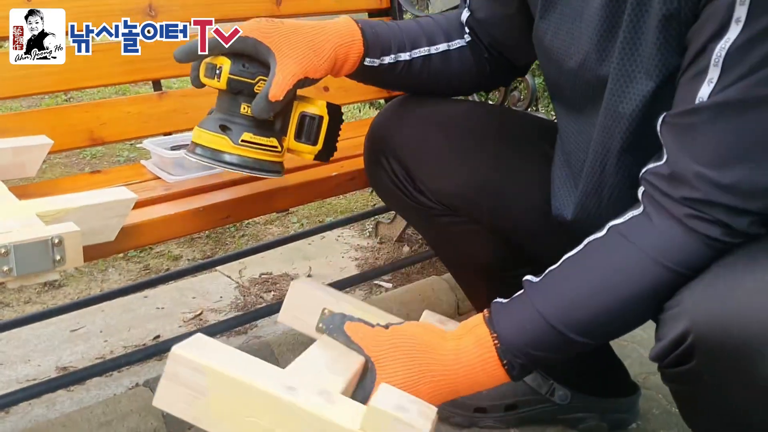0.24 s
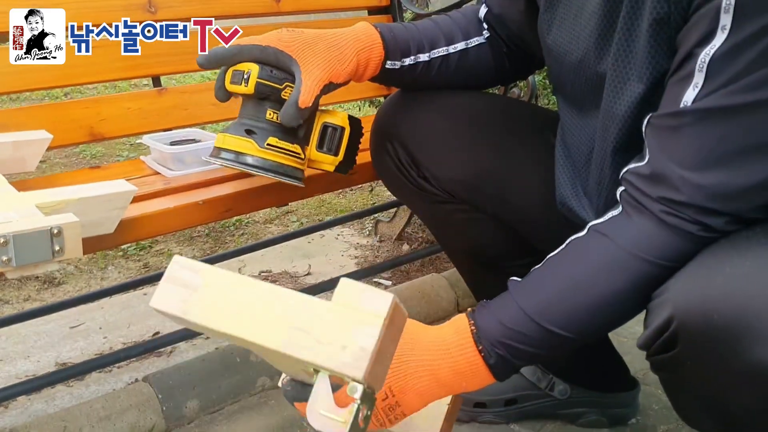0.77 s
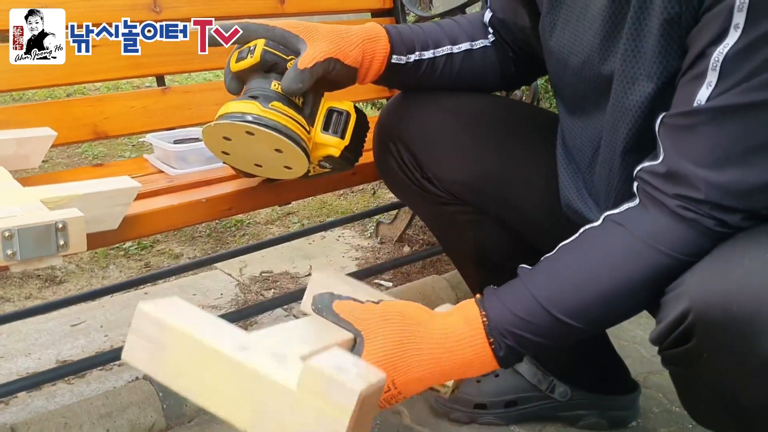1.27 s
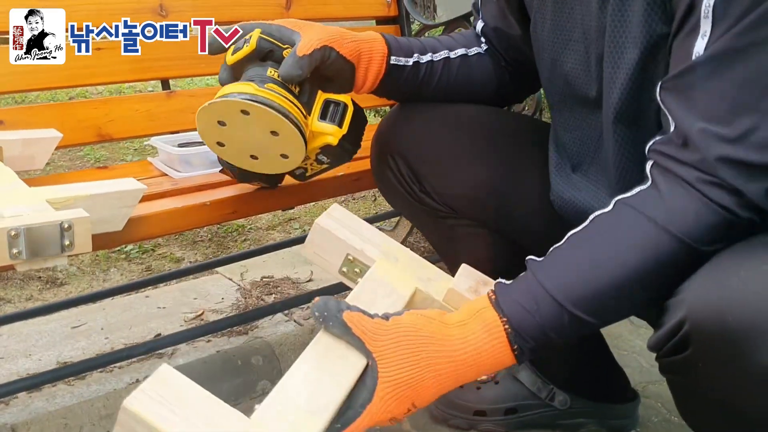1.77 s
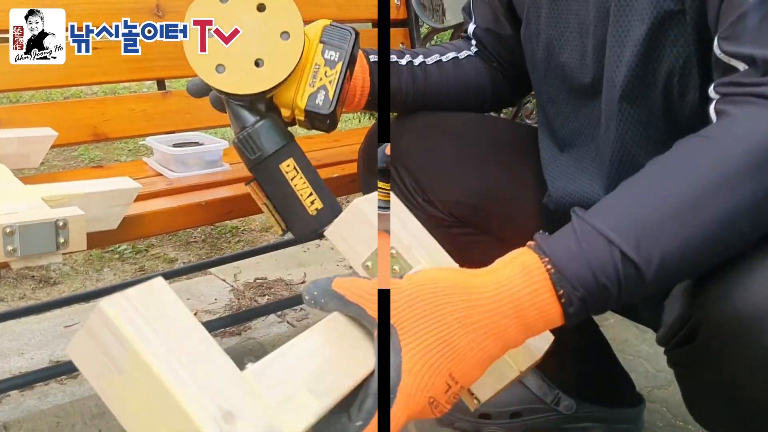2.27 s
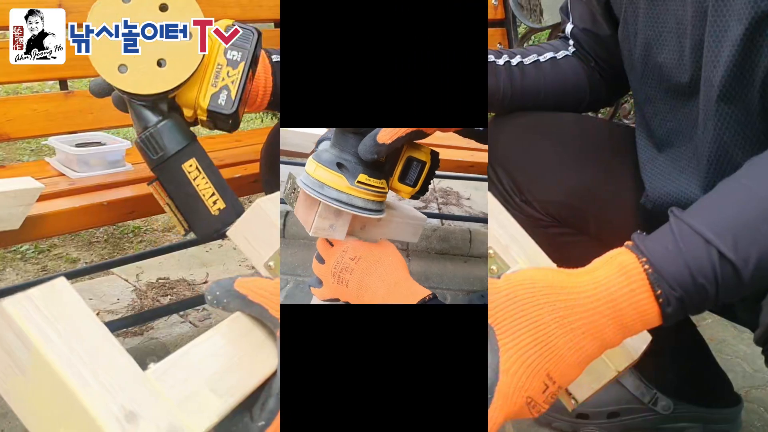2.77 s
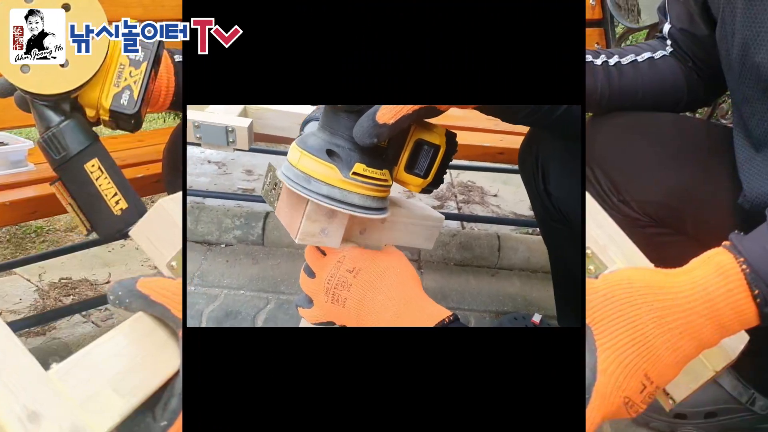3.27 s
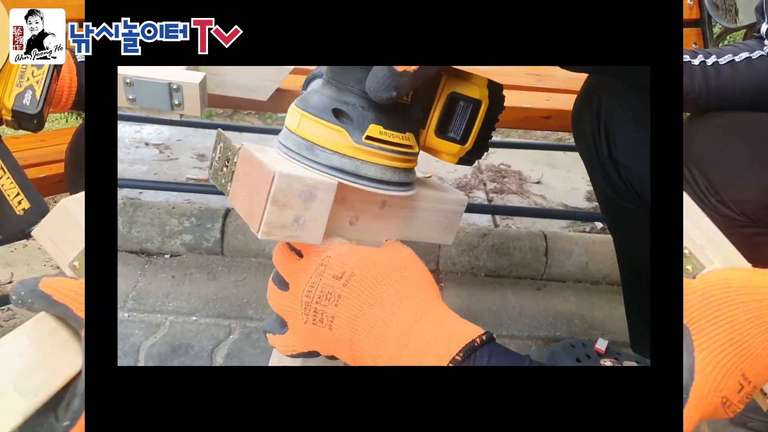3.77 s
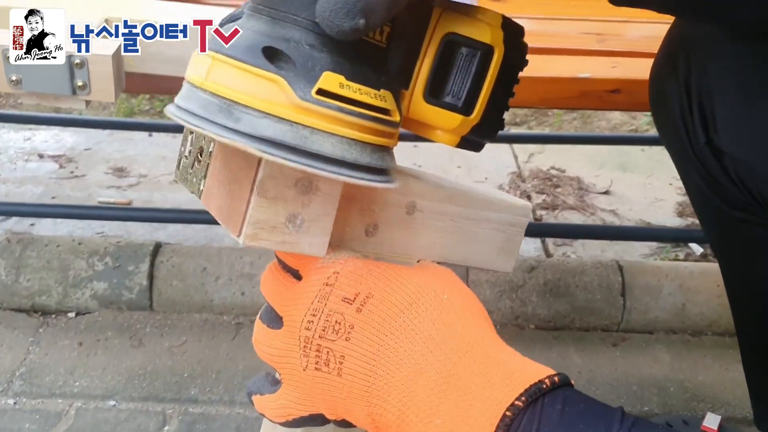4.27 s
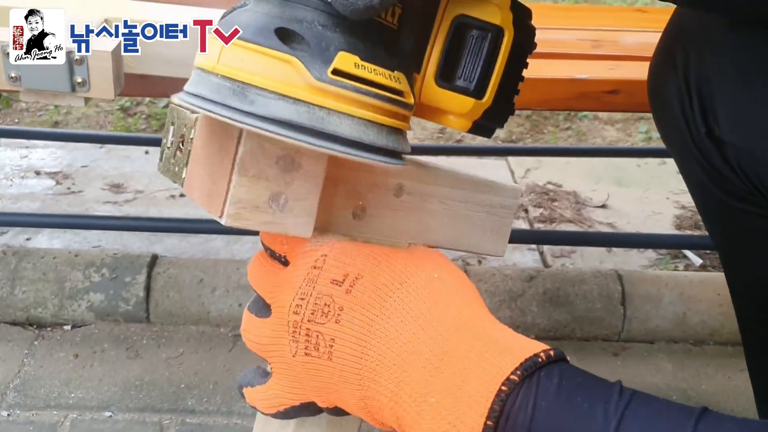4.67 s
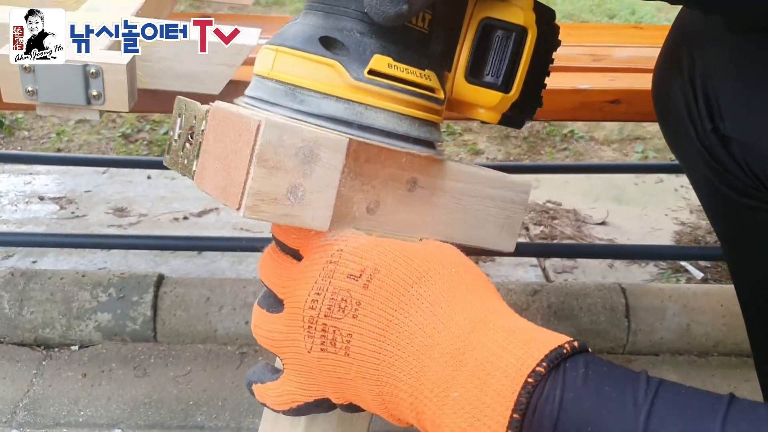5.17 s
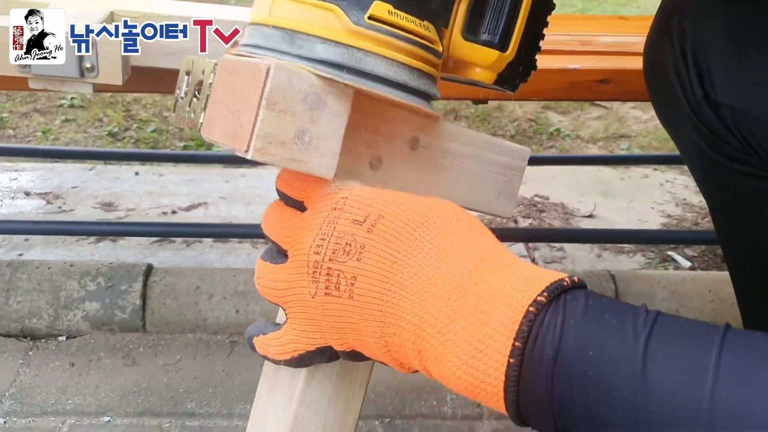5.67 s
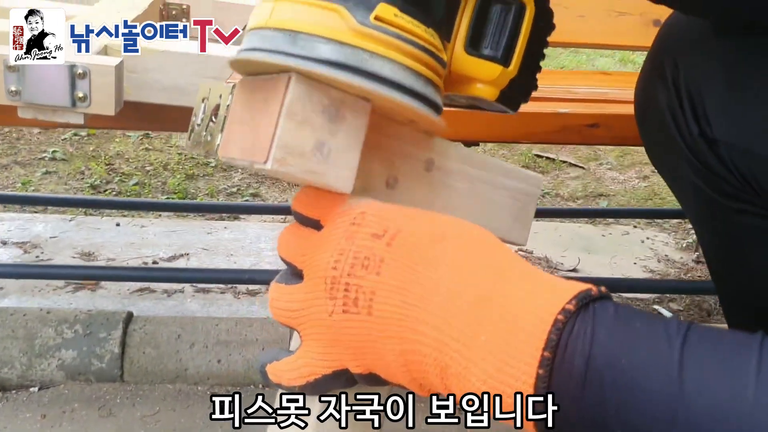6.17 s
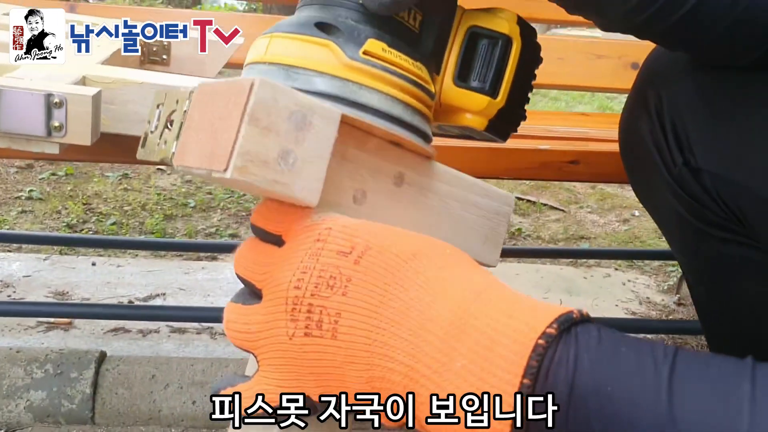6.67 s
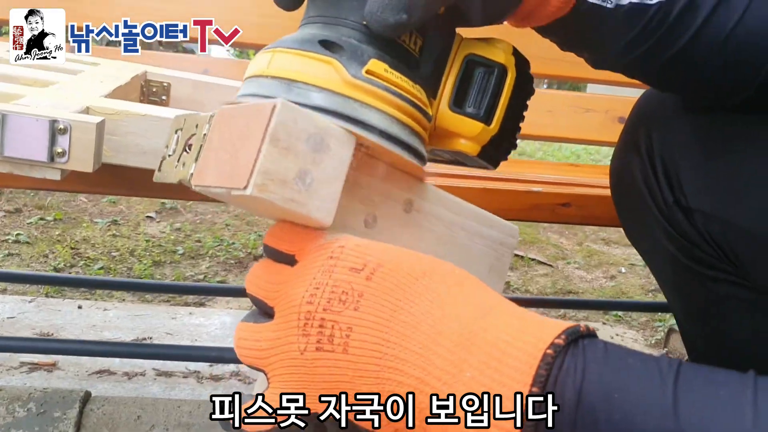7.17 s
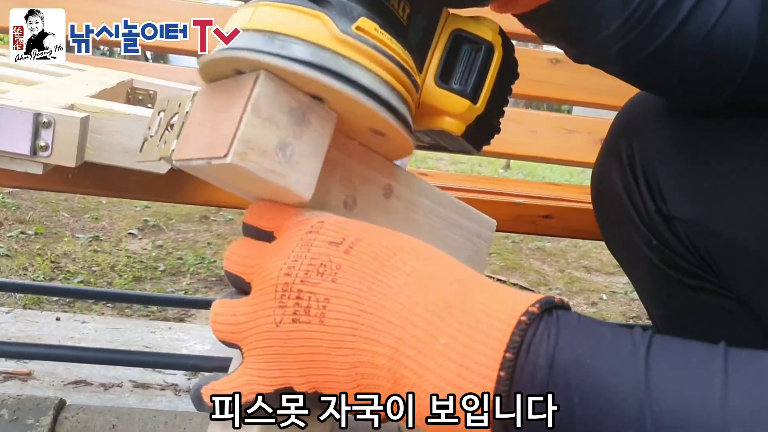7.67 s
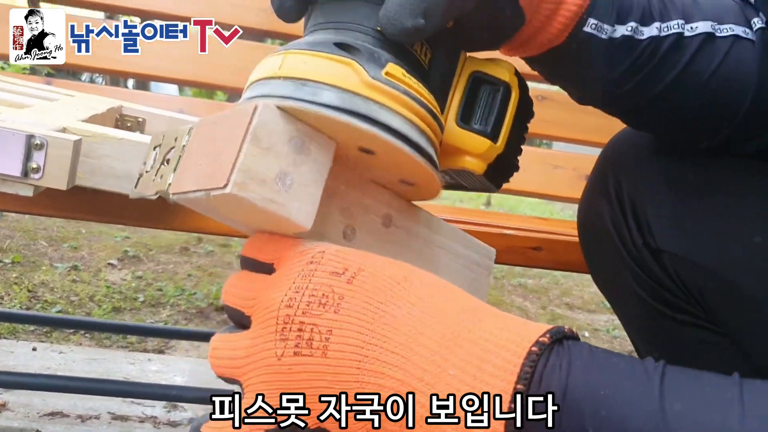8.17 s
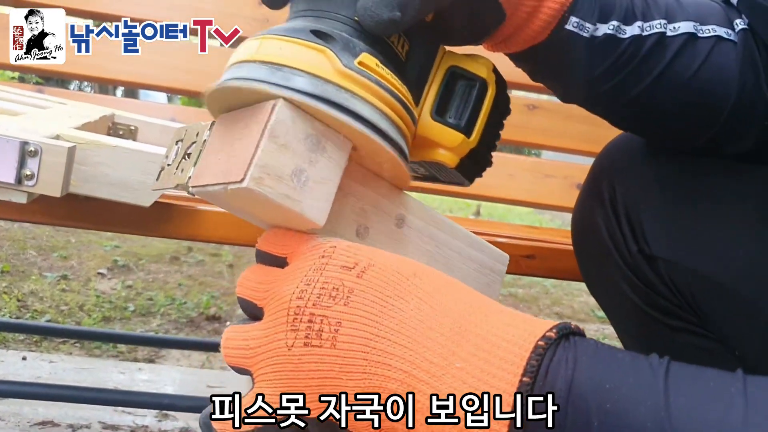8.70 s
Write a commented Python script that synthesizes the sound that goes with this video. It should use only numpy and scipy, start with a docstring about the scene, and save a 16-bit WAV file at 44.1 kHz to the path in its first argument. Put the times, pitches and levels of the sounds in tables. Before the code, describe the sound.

Outdoors, a vehicle draws near as wood is handled; sound cuts out, then an electric sander drones and hisses harshly on a block until the end.

```python
"""A vehicle draws near a quiet park bench: rumble, roar and hiss are coloured noise that swells, with a thin
whistle. Meanwhile wood is handled: ticks and knocks are short puffs of band noise. The sound drops out and
ticks once, a scrap of three sines; then an orbital sander runs on a hand-held block: orbit harmonics, pad
chatter and grit noise locked to the orbit. Only the right input is live; the left holds a trace and faint hiss."""
import sys
import numpy as np
from scipy import signal
from scipy.io import wavfile
from scipy.ndimage import uniform_filter1d

SR = 44100
rng = np.random.default_rng(int(sys.argv[2]) if len(sys.argv) > 2 else 0)


def log_audio(samples):
    """Write samples as a 16-bit WAV file to the path given in sys.argv[1]."""
    # one column per channel
    frames = np.atleast_2d(samples).T
    # limit to full scale, then quantise
    limited = np.clip(frames, -1, 1)
    pcm = np.round(limited * 32767).astype(np.int16)
    wavfile.write(sys.argv[1], SR, pcm)


N = 394254

# Levels of the sander, handling and traffic are in dB before scene() doubles those layers.
SILENCE_START_S, SILENCE_END_S = 2.1535, 2.3527


def sander():
    """The motor turns the pad at a wandering speed; that one orbit angle drives orders, chatter and grit."""
    # The sander under the moving hand. Each row: time in s, orbit speed in Hz before sag and wander.
    speed_curve = [(2.36, 145.1), (2.99, 143.6), (3.35, 144.2), (3.54, 142.6), (3.63, 144.5), (3.81, 143.8),
                   (4.0, 145.8), (4.25, 141.6), (4.41, 140.5), (4.66, 143.9), (4.81, 142.3), (5.11, 143.1),
                   (5.28, 146.5), (5.46, 147.4), (5.99, 144.1), (6.1, 145.5), (6.3, 143.9), (6.63, 143.4),
                   (6.77, 145.7), (6.94, 146.3), (7.14, 143.4), (7.25, 145.4), (7.55, 143.5), (7.74, 140),
                   (7.95, 143), (8.22, 143.5), (8.48, 140.7), (8.93, 140.4)]
    # The two strongest orders trade places as the pad travels.
    # Each row: time in s, third order level in dB, second order level in dB.
    hum_curve = [(2.36, -28.5, -31.5), (2.6, -22, -36.5), (2.8, -34, -32.5), (2.84, -22, -32),
                 (2.98, -25.5, -38.5), (3.04, -30.5, -31), (3.22, -23.5, -32), (3.33, -33.5, -30),
                 (3.47, -22.5, -37), (3.64, -31.5, -29), (3.77, -22.5, -38.5), (4.02, -31, -30),
                 (4.24, -20, -33.5), (4.54, -26.5, -38.5), (4.68, -28, -30), (4.81, -21, -42),
                 (4.97, -25, -33), (5.12, -24, -60), (5.2, -30.5, -31.5), (5.84, -24.5, -31.5),
                 (5.91, -24, -38), (6.09, -30, -27), (6.26, -22, -42), (6.42, -30, -27), (6.53, -21, -33),
                 (6.71, -31.5, -33), (7.04, -24, -28.5), (7.1, -23, -36.5), (7.37, -31.5, -28),
                 (7.52, -21, -37.5), (7.61, -30.5, -31), (7.92, -26.5, -39.5), (8.1, -26, -31),
                 (8.38, -22.5, -43.5), (8.42, -26.5, -50), (8.47, -23, -37), (8.71, -27, -32.5),
                 (8.78, -25, -42.5), (8.87, -25.5, -30.5), (8.93, -30, -32)]
    # Slow levels. Each row: time in s, fifth order level in dB, fourth order level in dB,
    # grit level in dB before its sway.
    slow_curve = [(2.36, -36.5, -34, -22), (2.6, -30, -29.0, -22.5), (2.76, -27, -34, -22),
                  (3.34, -36, -28.5, -22), (3.71, -34, -31.0, -22), (4.18, -32.5, -27.5, -22.5),
                  (4.51, -29.5, -36.5, -22), (4.66, -26.5, -30, -21), (4.78, -32.5, -29.1, -23.5),
                  (5.38, -35.5, -28.5, -22), (5.66, -35, -31, -23.2), (5.98, -30, -28.5, -21.6),
                  (6.64, -35, -30, -22.5), (6.85, -34.4, -28, -21), (7.11, -34, -30, -23.5),
                  (7.71, -31.6, -29, -21), (8.2, -35.5, -31.5, -22.5), (8.93, -32.5, -25.5, -21.5)]
    sag_hz_per_db = 0.12  # the motor sags a little while the third order is strong

    speed_hz, = played(speed_curve)
    third_db, second_db = played(hum_curve)
    fifth_db, fourth_db, grit_db = played(slow_curve)
    running = round(hum_curve[0][0] * SR)
    third_excess_db = third_db - third_db[running:].mean()
    speed_hz = speed_hz - sag_hz_per_db * third_excess_db
    fast_hz = speed_hz - speed_hz[running:].mean()
    orbit = 2 * np.pi * np.cumsum(speed_hz + 0.5 * drift(11.65).real) / SR
    contact = orbit + 0.029 * drift(8.9).real  # the pad lands a little early or late

    out = unbalanced_weight(orbit)
    out += strong_orders(contact, second_db, third_db)
    out += wandering_orders(contact, fourth_db, fifth_db, third_excess_db, fast_hz)
    # under light load the buzz takes over from scratching
    held_db = 0.59 * fast_hz + 3.23 * drift(5.8).real
    grit_db = grit_db - 0.035 * third_excess_db + 0.85 * drift(6).real
    return out + pad_chatter(contact, held_db) + grit_hiss(orbit, contact, held_db, grit_db)


def unbalanced_weight(orbit):
    """The unbalanced weight gives one nearly steady cosine per orbit."""
    level_db = -32.5 + 0.8 * drift(8.0).real
    return gain_of(level_db) * np.sqrt(2) * np.cos(orbit)


def strong_orders(contact, second_db, third_db):
    """The second and third multiples of the orbit, with strength and phase wavering a little."""
    out = np.zeros(N)
    for k, db in ((2, second_db), (3, third_db)):
        swing = evened(1 + 0.12 * k * drift(6.2))  # the higher order is rougher
        wave = swing * np.exp(1j * (k * contact + 0.47 * k ** 2))
        out += np.sqrt(2) * gain_of(db) * wave.real
    return out


def wandering_orders(contact, fourth_db, fifth_db, third_excess_db, fast_hz):
    """Orders from the fourth up, each partly steady and partly wandering as the pad creeps."""
    # Each row: multiple of the orbit speed, base level in dB, steady share from 0 to 1,
    # change in dB per dB of the third order, change in dB per Hz of orbit speed.
    upper_orders = [(6, -35.5, 0.83, 0.5, 0.5), (7, -35, 0.5, 0.6, 0.5), (8, -28.5, 0.78, 0.27, 0.3),
                    (9, -27.5, 0.87, -0.26, 0.64), (10, -33.5, 0.27, 0, .1), (11, -33, 0.62, 0.45, .4),
                    (12, -30.5, 0.69, 0, 1), (13, -34.5, .3, 0, -0.5), (14, -34.5, 0.68, 0.1, 0.4),
                    (15, -42.5, 0, -2, -4), (16, -46, .4, 4, 3), (17, -48, 1, 0, 0),
                    (18, -45.5, 0, 0, -1.5), (19, -46, 0.98, 0.5, 2), (20, -41.5, 0.84, 1, -1)]
    lower_orders = [(4, fourth_db, 0.81, 0, 0), (5, fifth_db, 0.39, 0, 0)]
    housing_db = 2 * drift(7.2).real  # orders from 11 up swell together as the housing rings

    out = np.zeros(N)
    for k, db, steady, per_third, per_speed in [*lower_orders, *upper_orders]:
        follows_db = per_third * third_excess_db + per_speed * fast_hz
        if k >= 11:
            follows_db = follows_db + housing_db
        swing = steady + np.sqrt(1 - steady ** 2) * drift(6.5)
        phase = k * contact + 0.3 * k ** 2  # a fixed offset spreads the orders' phases
        out += np.sqrt(2) * gain_of(db + follows_db) * (swing * np.exp(1j * phase)).real
    return out


def pad_chatter(contact, held_db):
    """Patchy noise of the pad, pulsing once and twice an orbit and dropping as the buzz rises."""
    # Each row: frequency in Hz, relative level in dB per Hz.
    chatter_colour = [(20, -58), (50, -31), (100, 1), (200, -5), (420, 4), (900, -2.5), (1250, -28),
                      (1900, 13.5), (2500, 4.5), (3200, -3), (5000, -49)]
    pulse_db = 1.1 * np.cos(contact) + 0.76 * np.cos(2 * contact)
    level_db = -31 - 0.4 * held_db + pulse_db
    return noise(chatter_colour, 2.2, 0.76, size=2048) * gain_of(level_db)


def grit_hiss(orbit, contact, held_db, grit_db):
    """Grit scratches as free noise and buzzes as a retraced track, both pulsing with the orbit."""
    # Colour of the scratching. Each row: frequency in Hz, relative level in dB per Hz.
    scratch_colour = [(1350, -54), (2300, -3.5), (2820, -3.5), (3030, -9), (3400, -3), (4060, 0.5),
                      (4930, 1), (5480, -2), (6990, 3), (7770, -3), (9520, -7), (10600, -6), (14500, -14),
                      (15400, -15), (16000, -29)]
    # Colour of the buzz. Each row: frequency in Hz, relative level in dB per Hz.
    buzz_colour = [(1500, -13), (2300, -1), (2900, -8), (3500, -1), (4300, -1), (5500, -5.5), (7000, -5.5),
                   (10000, -10), (16000, -25)]
    # the bite once an orbit comes at a wandering angle; a weaker pulse comes twice an orbit
    bite_db = 1.4 * np.cos(contact + 2.2 + 1.7 * drift(7.8).real)
    scrape_db = bite_db + 0.62 * np.cos(2 * contact)
    scratch = 0.81 * gain_of(-0.6 * held_db) * noise(scratch_colour, 1.3, 1.0)
    track = retraced(orbit, kept=0.77)
    buzz = 0.58 * gain_of(held_db) * noise(buzz_colour, 2.2, source=track)
    return (scratch + buzz) * gain_of(grit_db + scrape_db)


def retraced(angle, kept):
    """Each orbit the grit meets nearly the same wood: a rough track that renews from turn to turn."""
    turns, points = 1400, 320  # points per turn
    fresh = rng.standard_normal((turns, points))
    track = signal.lfilter([1], [1, -kept], fresh, axis=0).ravel()
    return np.interp(angle / (2 * np.pi) * points, np.arange(track.size), track)


def handling():
    """Handled wood and plastic: ticks are brief snaps of noise, knocks a low thud with a clack."""
    # Small ticks. Each row: start in s, nominal peak in dB, nominal centre in Hz,
    # relative brightness in dB.
    tick_rows = [(0.1101, -43, 3950, -18), (0.183, -39, 4480, -18), (0.9434, -34, 5660, -20),
                 (0.9507, -37, 6940, -23), (1.2935, -29, 3850, -24), (1.4626, -31, 4430, -28),
                 (1.4794, -36, 5260, -17), (1.505, -27, 4040, 3.5), (1.6152, -30, 5360, -22),
                 (1.6811, -24, 4930, -22), (1.939, -27, 5390, -18), (2.0522, -17.5, 4480, -20),
                 (2.065, -21, 4410, -23), (2.0872, -22, 4530, -14), (2.1116, -23, 5570, -17)]
    # Dull knocks of the block. Each row: start in s, nominal thud peak in dB, nominal clack peak in dB.
    knock_rows = [(0.946, -32, -25), (1.912, -32, -38), (2.033, -11.5, -29.5), (2.0525, -14.5, -20.5),
                  (2.111, -24, -20)]

    out = np.zeros(N)
    for s, db, hz, bright_db in tick_rows:
        body = burst(0.6 * hz, 1.35 * hz, t60=0.046, rise=0.00044)
        sparkle = burst(7000, 16000, t60=0.019, rise=0.0006)
        snap = body + gain_of(bright_db + 7.0) * sparkle
        add(out, s, gain_of(db - 3.5) * snap)
    for s, thud_db, clack_db in knock_rows:
        thud = gain_of(thud_db + 3.0) * burst(160, 690, t60=0.063, rise=0.0044)
        clack = gain_of(clack_db + 5.0) * burst(960, 1830, t60=0.05, rise=0.002)
        add(out, s, thud + clack)
    return out


def burst(lo_hz, hi_hz, t60, rise):
    """A short puff of band noise, rms 0.5 before its decay (60 dB in t60 s) and linear rise (s)."""
    t = np.arange(3000) / SR
    band = signal.butter(2, [lo_hz, hi_hz], "band", fs=SR, output="sos")
    puff = signal.sosfilt(band, rng.standard_normal(3500))[500:]  # skip the filter's start
    return 0.5 * evened(puff) * gain_of(-60 * t / t60) * np.minimum(t / rise, 1)


def lone_tick():
    """Three sines for a third of a millisecond in the silence."""
    out, t = np.zeros(N), np.arange(16) / SR
    buzz = np.sin(2 * np.pi * 1800 * t)
    buzz += 1.4 * np.cos(2 * np.pi * 5300 * t)
    buzz += 0.36 * np.sin(2 * np.pi * 10500 * t)
    add(out, 2.2729, gain_of(-15) * buzz * signal.windows.tukey(len(t), 0.3))
    return out


def traffic():
    """Bands of noise swell as the vehicle nears; the hiss is still rising when the sound drops out."""
    # Low rumble. Each row: frequency in Hz, relative level in dB per Hz.
    rumble_colour = [(15, -57), (25, -32), (32, -36), (53, -21.5), (118, -2.5), (257, -11.5), (299, -13.5),
                     (348, -10.5), (400, -20), (520, -64), (880, -120)]
    # Roar. Each row: frequency in Hz, relative level in dB per Hz.
    roar_colour = [(150, -32), (250, -6), (350, -6), (420, -5), (530, 1), (800, -5.5), (1100, -12.5),
                   (2000, -52.5)]
    # Upper part of the roar. Each row: frequency in Hz, relative level in dB per Hz.
    upper_colour = [(500, -37), (800, -4), (1100, 0), (1500, 1.5), (1900, -3.5), (2400, -6.5), (3500, -13),
                    (6000, -60)]
    # Tyre hiss. Each row: frequency in Hz, relative level in dB per Hz.
    tyre_colour = [(1180, -34), (2000, -28.5), (2620, 1.5), (3650, -6), (3980, 1.5), (14700, -18),
                   (16000, -36)]
    rumble = swell(-46, -30.5, near_s=1.74, bend=1.4) * noise(rumble_colour, 2.6, size=4096)
    roar = swell(-50.5, -39, near_s=1, bend=5) * noise(roar_colour, 1.5, size=1024)
    upper_roar = swell(-52.5, -37, near_s=1.84, bend=1.4) * noise(upper_colour, 2.1)
    tyre_hiss = swell(-59, -39, near_s=2.5, bend=1.83) * noise(tyre_colour, 1.9, 0.67)
    return rumble + roar + upper_roar + tyre_hiss + thin_whistle()


def thin_whistle():
    """A steady pitch that sounds three times with short ramps and a flickering level."""
    # Each row: start in s, length in s, level in dB before the flicker.
    whistle_rows = [(1.04, 0.25, -50.5), (1.26, .2, -53), (1.68, .21, -53)]
    pitch_hz, edge_s = 5120, 0.037
    t = np.arange(N) / SR
    shape = np.zeros(N)
    for s, length, db in whistle_rows:
        to_edge = np.minimum(t - s, s + length - t)
        shape += gain_of(db) * np.clip(to_edge / edge_s, 0, 1)
    return shape * np.cos(2 * np.pi * pitch_hz * t) * abs(0.8 + 0.5 * drift(25.0))


def left_input_hiss(before, after):
    """Faint patchy noise of the left input, rising before the silence and level while the sander runs."""
    # Each row: frequency in Hz, relative level in dB per Hz.
    left_colour = [(50, -7), (1000, -1), (4000, 6), (8000, 4), (15000, 3)]
    level = swell(-69, -56.5, near_s=1.5, bend=1.8) * before + gain_of(-69.2) * after
    return level * noise(left_colour, 3.1)


def swell(far_db, near_db, near_s, bend):
    """A level that rises along a quarter sine until near_s, then holds; bend over 1 comes up late."""
    way = np.clip(np.arange(N) / SR / near_s, 0, 1)
    return gain_of(far_db + (near_db - far_db) * np.sin(np.pi / 2 * way) ** bend)


def noise(colour, patchy_db, flicker_db=0., size=512, source=None):
    """Colours white noise, or a source, with drifting patches and a flicker shared by all bands; rms 1."""
    source = rng.standard_normal(N) if source is None else source
    overlap = 3 * size // 4
    hz, _, z = signal.stft(source, SR, nperseg=size, noverlap=overlap)
    patches = rng.standard_normal(z.shape[::-1]).T
    patches = uniform_filter1d(patches, 10, axis=0)  # across frequency
    patches = evened(uniform_filter1d(patches, 24, axis=1))  # across time
    flicker = evened(uniform_filter1d(rng.standard_normal(z.shape[1]), 6))
    f, db = np.transpose(colour)
    shape_db = np.interp(np.log(hz + 1), np.log(f + 1), db)[:, None]
    z = z * gain_of(shape_db + patchy_db * patches + flicker_db * flicker)
    return evened(signal.istft(z, nperseg=size, noverlap=overlap)[1][:N])


def drift(hz):
    """Slow complex chance, rms 1, low-passed at hz with one pole."""
    step = 64  # samples between coarse points
    coarse = rng.standard_normal((N // step + 400, 2)) @ [1, 1j]
    r = np.exp(-2 * np.pi * hz * step / SR)
    coarse = evened(signal.lfilter([1], [1, -r], coarse)[398:])
    return np.interp(np.arange(N) / step, np.arange(len(coarse)), coarse)


def played(rows):
    """Each column of a curve table at every sample."""
    s, *columns = np.transpose(rows)
    return [np.interp(np.arange(N) / SR, s, c) for c in columns]


def gain_of(db):
    """Decibels to amplitude."""
    return 10 ** (np.asarray(db) / 20)


def evened(x):
    """Scales to rms 1."""
    return x / np.sqrt(np.mean(abs(x) ** 2) + 1e-20)


def add(mix, s, sound):
    """Mixes a sound in at a time in seconds."""
    part = mix[round(s * SR):][:len(sound)]
    part += sound[:len(part)]


def scene():
    """The park before the silence, the lone tick within it, the sander after it; left then right."""
    t = np.arange(N) / SR
    before, after = t < SILENCE_START_S, t > SILENCE_END_S
    park = (traffic() + handling()) * before
    live = 2 * (park + sander() * after) + lone_tick()
    left = gain_of(-58.5) * live + left_input_hiss(before, after)
    return np.array([left, live])


def record(dry):
    """Peaks over 0.6 are rounded, a low-pass limits the band, and full scale clips."""
    size = abs(dry)
    bent = np.sign(dry) * (0.6 + 0.5 * np.tanh((size - 0.6) / 0.5))
    rounded = np.where(size < 0.6, dry, bent)
    low_pass = signal.firwin(511, 15530, window=("kaiser", 9), fs=SR)  # edge in Hz
    return np.clip(signal.oaconvolve(rounded, low_pass[None], "same"), -1, 1)


dry = scene()
out = record(dry)
log_audio(out)
```